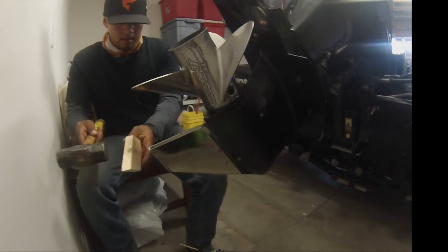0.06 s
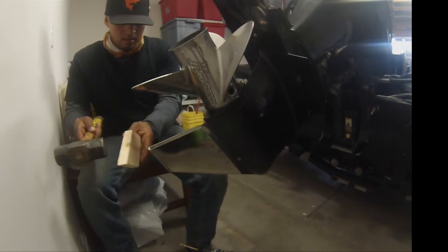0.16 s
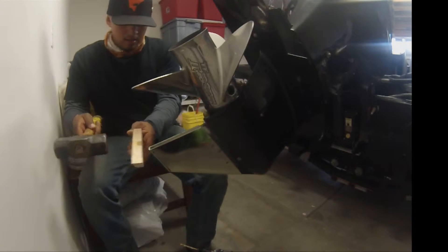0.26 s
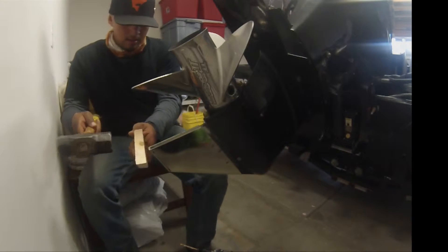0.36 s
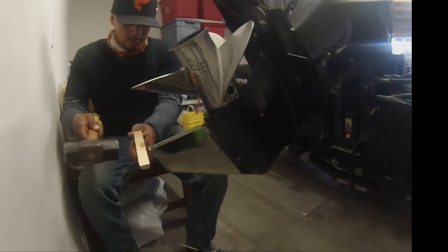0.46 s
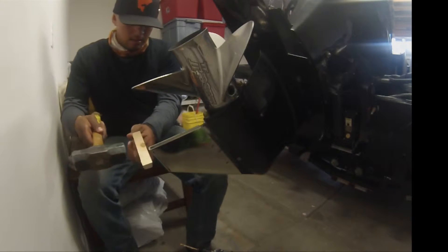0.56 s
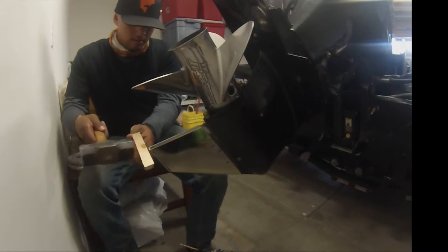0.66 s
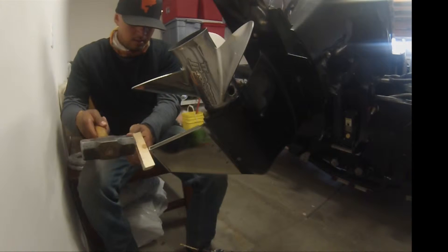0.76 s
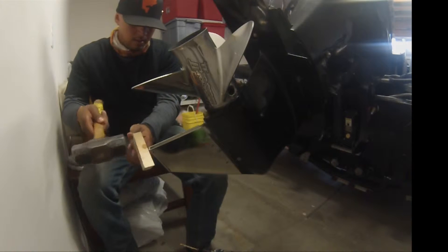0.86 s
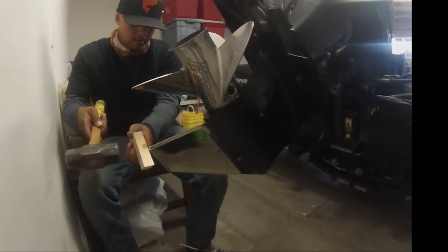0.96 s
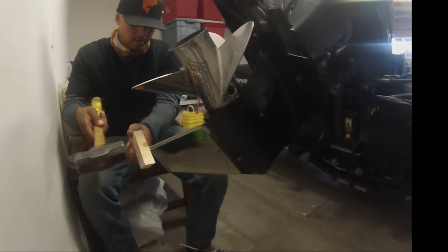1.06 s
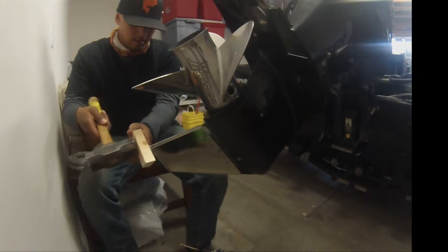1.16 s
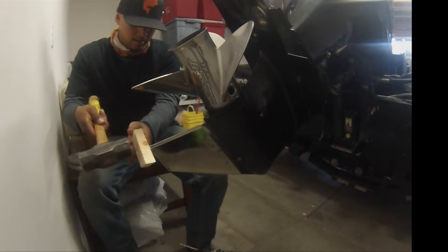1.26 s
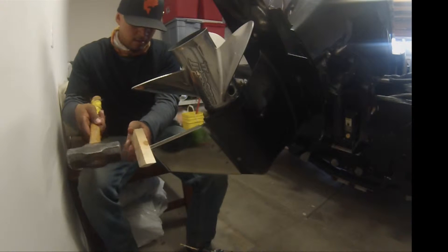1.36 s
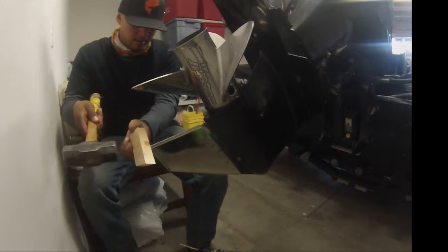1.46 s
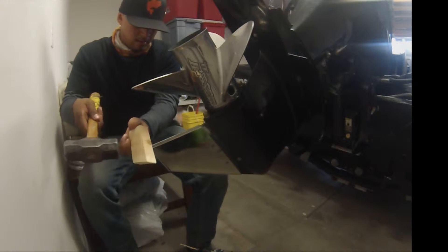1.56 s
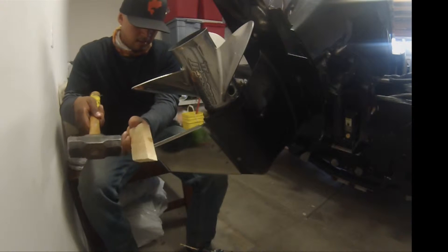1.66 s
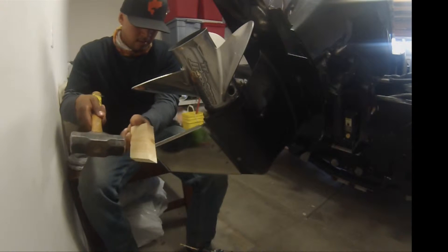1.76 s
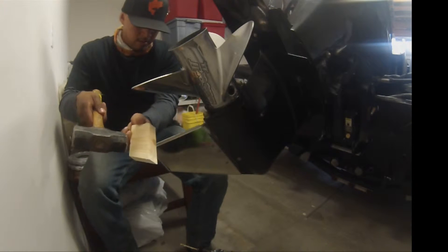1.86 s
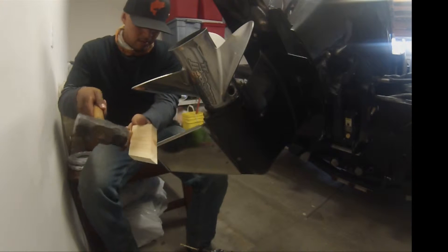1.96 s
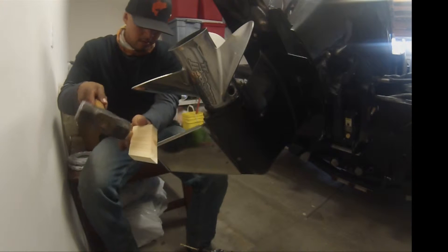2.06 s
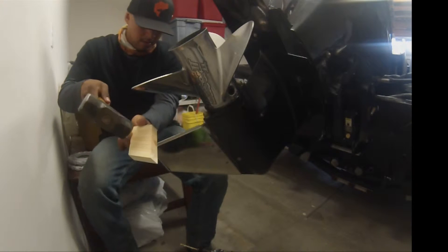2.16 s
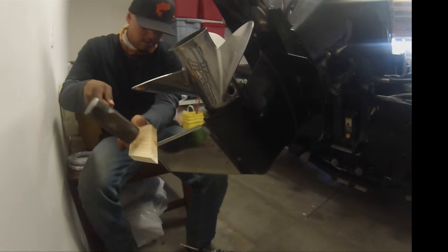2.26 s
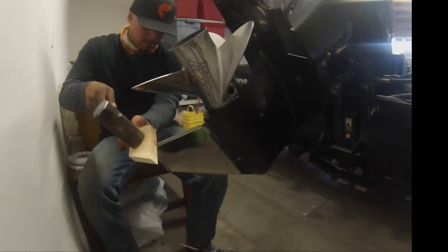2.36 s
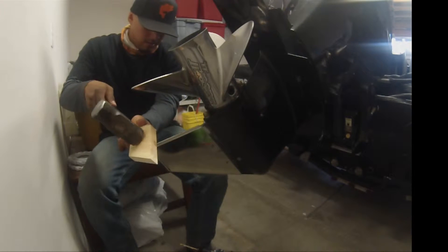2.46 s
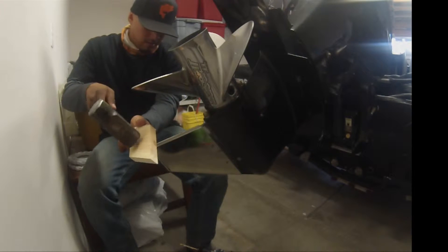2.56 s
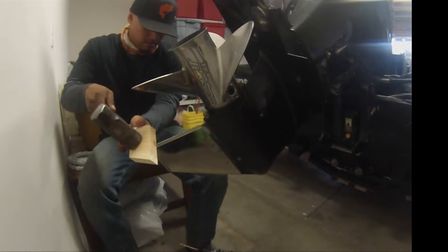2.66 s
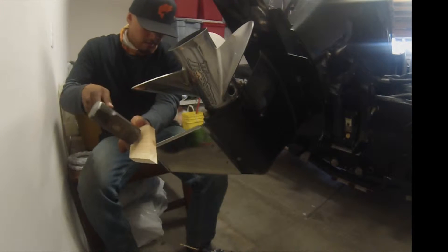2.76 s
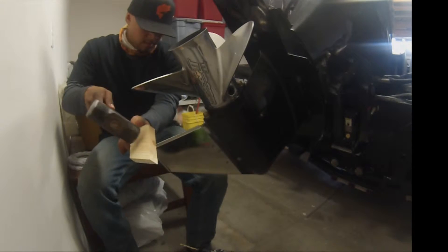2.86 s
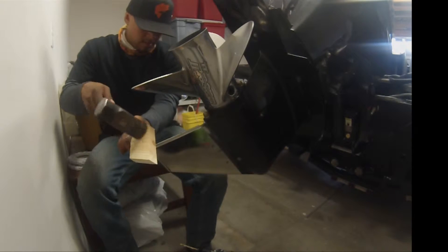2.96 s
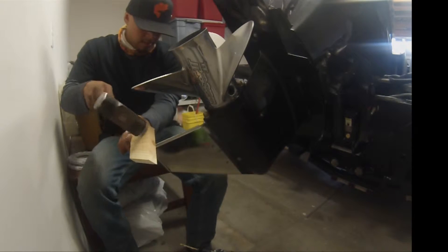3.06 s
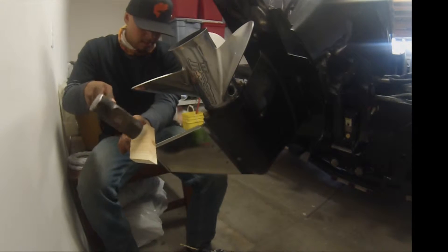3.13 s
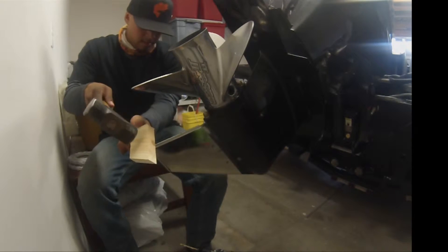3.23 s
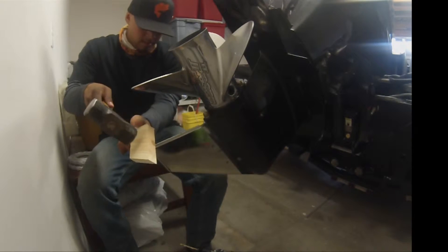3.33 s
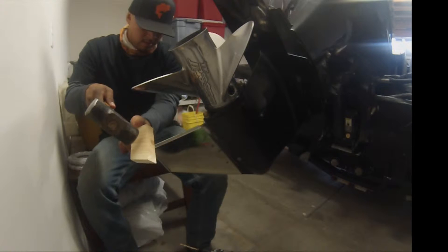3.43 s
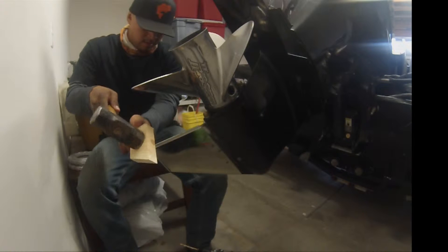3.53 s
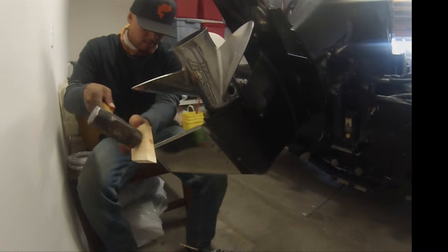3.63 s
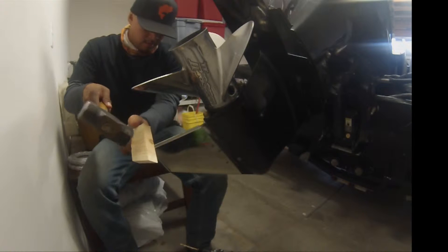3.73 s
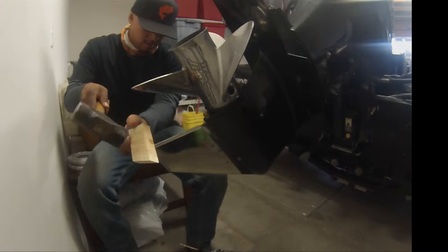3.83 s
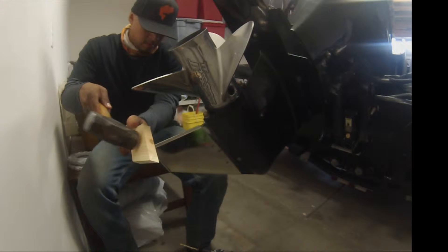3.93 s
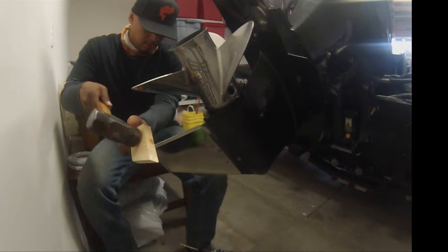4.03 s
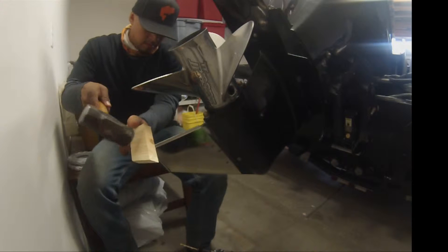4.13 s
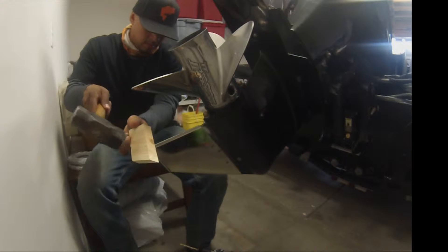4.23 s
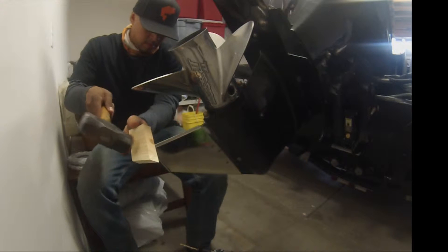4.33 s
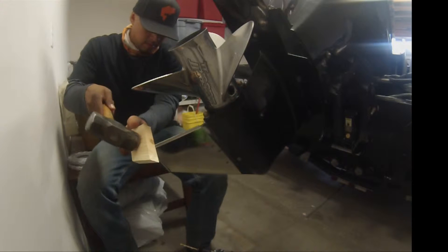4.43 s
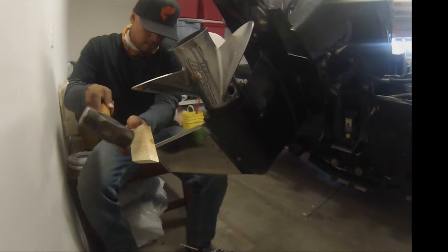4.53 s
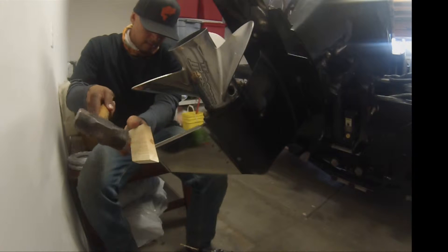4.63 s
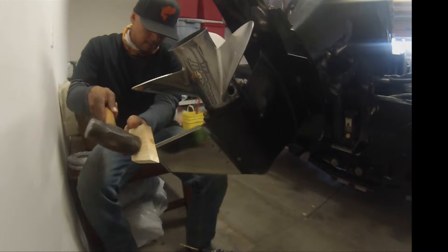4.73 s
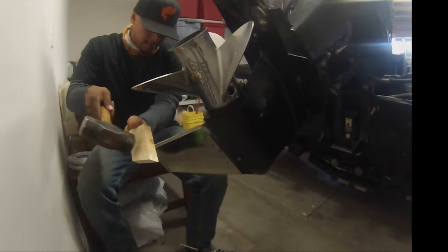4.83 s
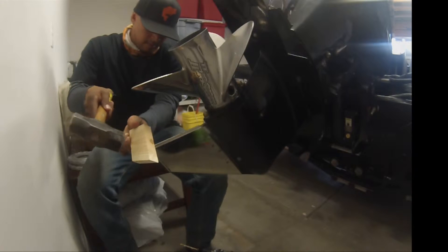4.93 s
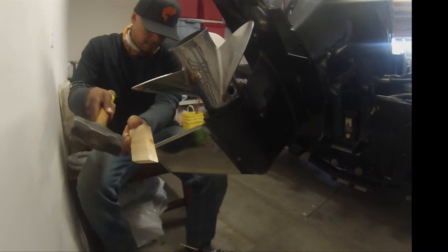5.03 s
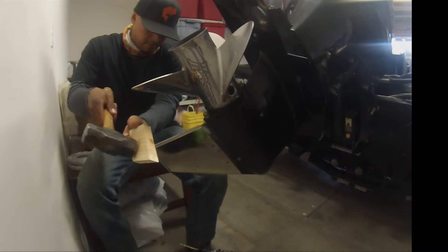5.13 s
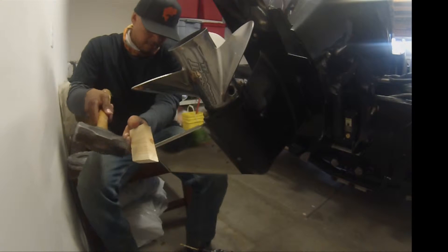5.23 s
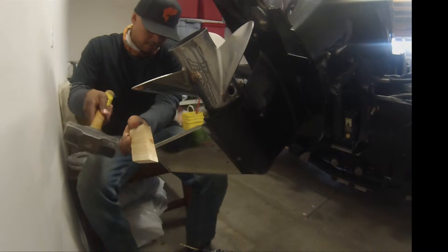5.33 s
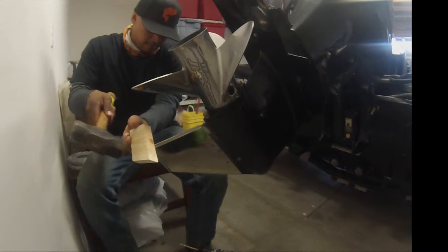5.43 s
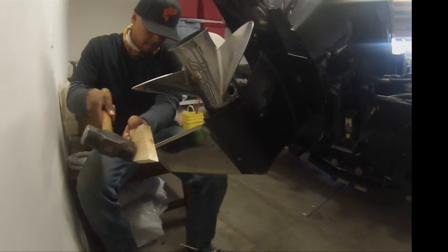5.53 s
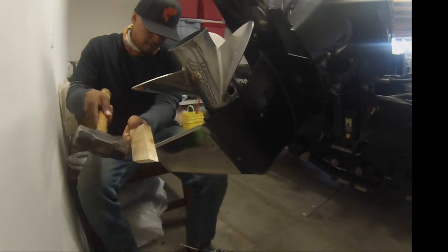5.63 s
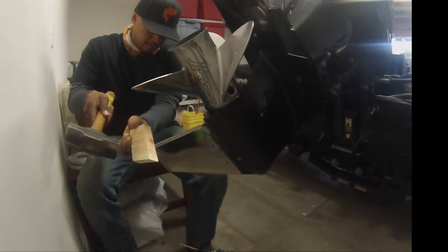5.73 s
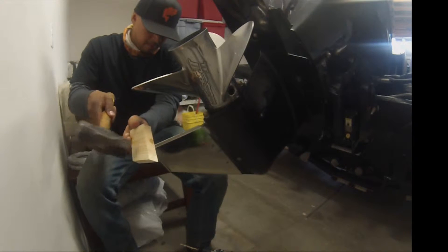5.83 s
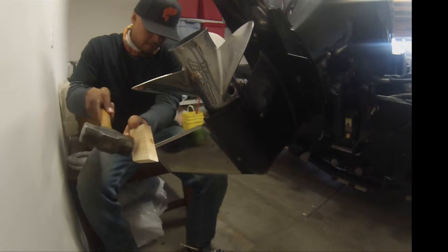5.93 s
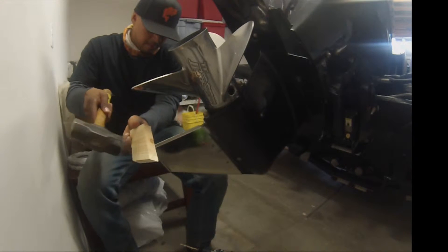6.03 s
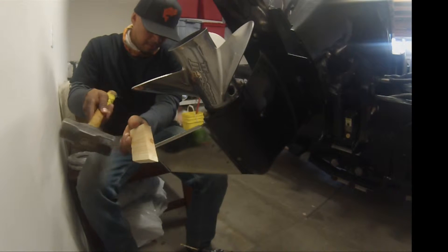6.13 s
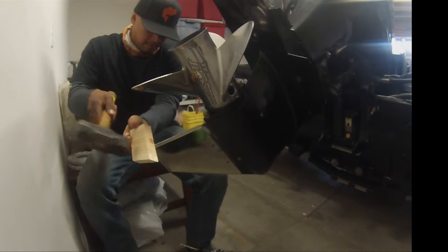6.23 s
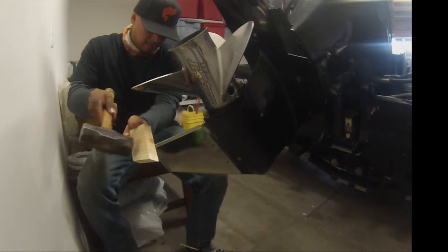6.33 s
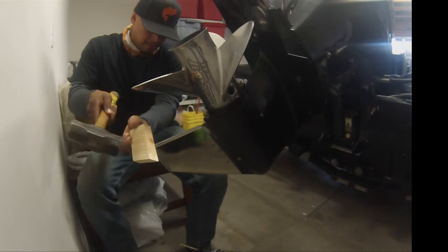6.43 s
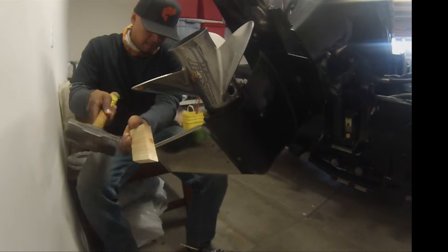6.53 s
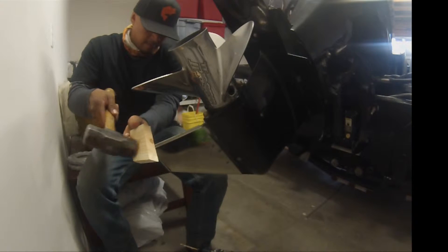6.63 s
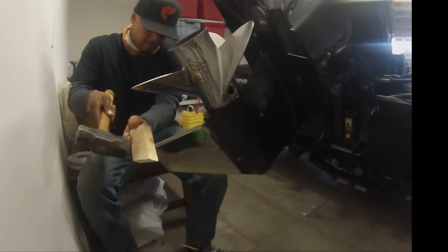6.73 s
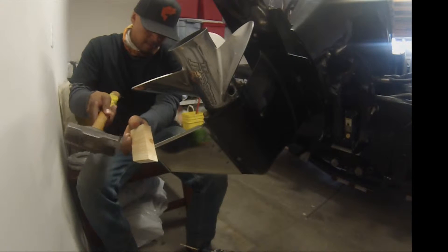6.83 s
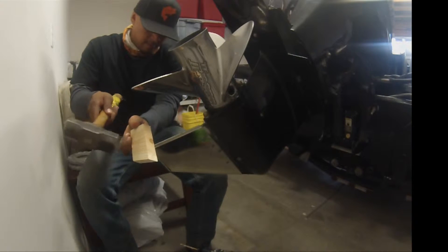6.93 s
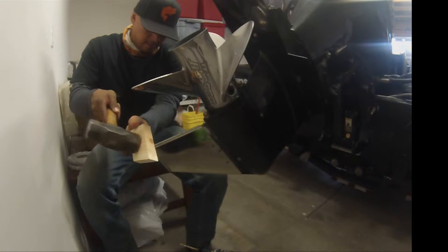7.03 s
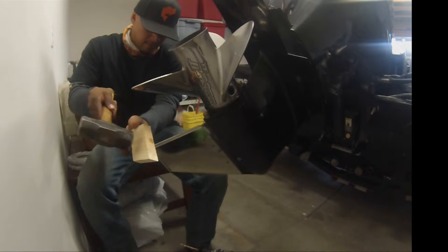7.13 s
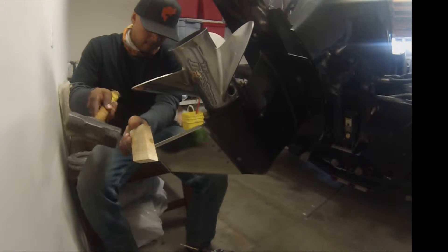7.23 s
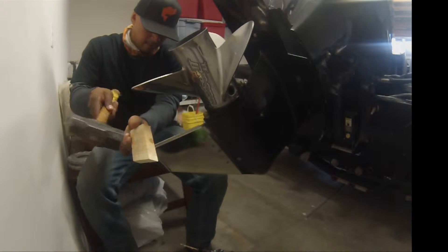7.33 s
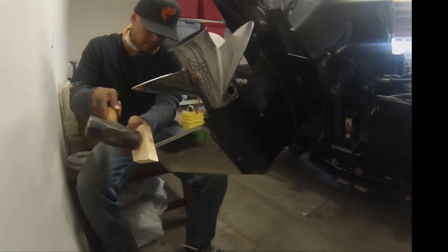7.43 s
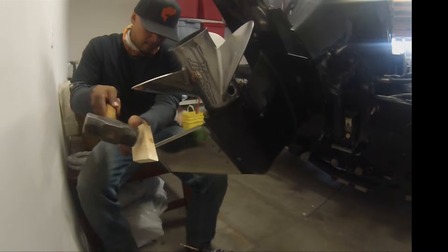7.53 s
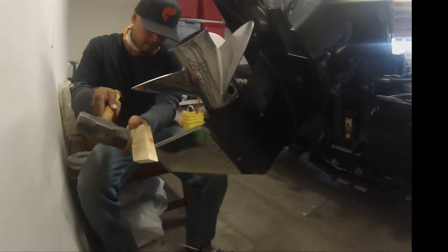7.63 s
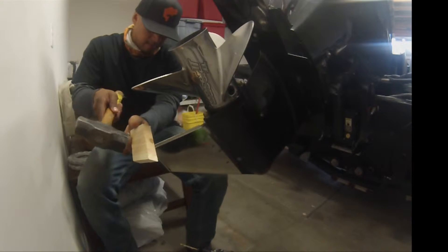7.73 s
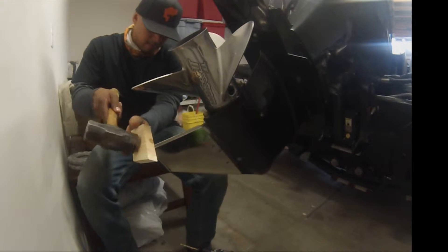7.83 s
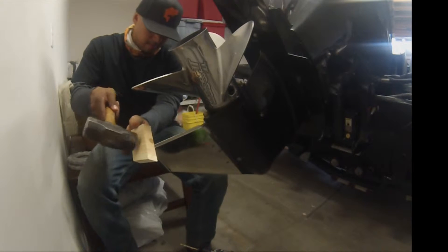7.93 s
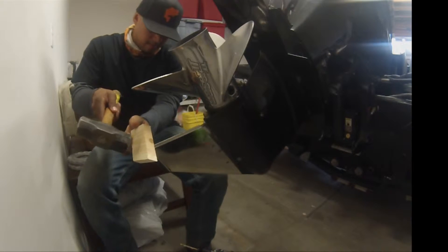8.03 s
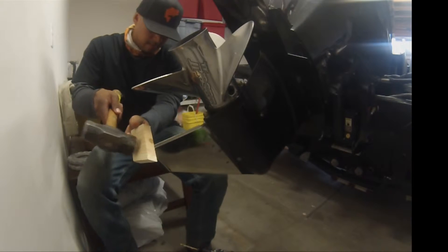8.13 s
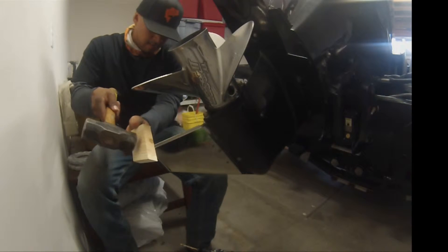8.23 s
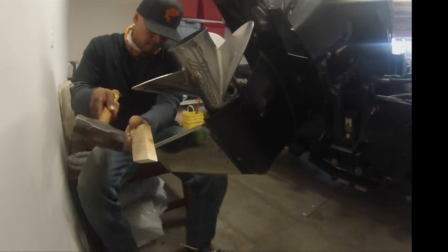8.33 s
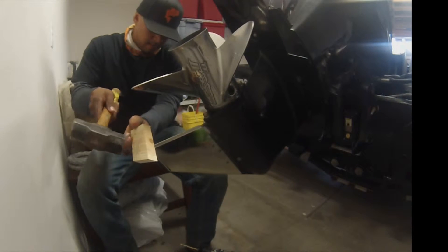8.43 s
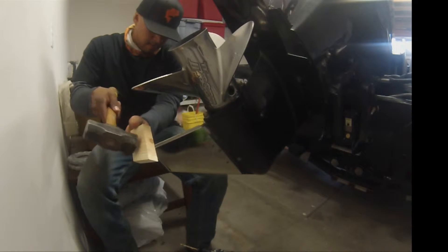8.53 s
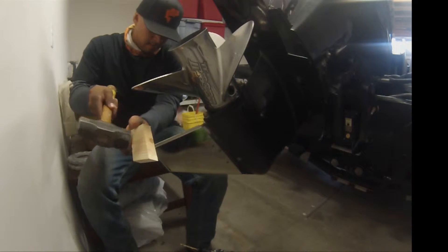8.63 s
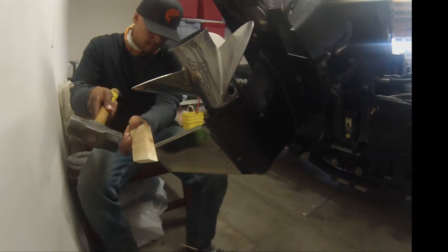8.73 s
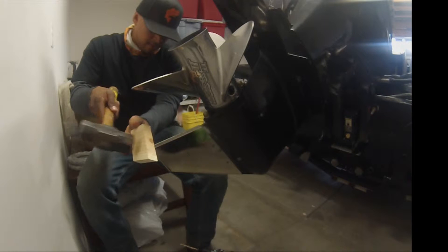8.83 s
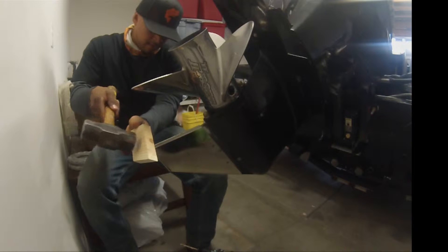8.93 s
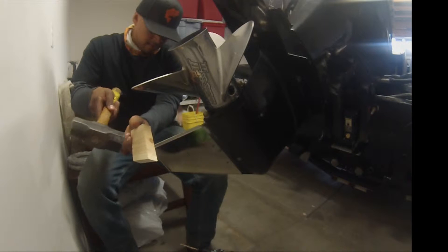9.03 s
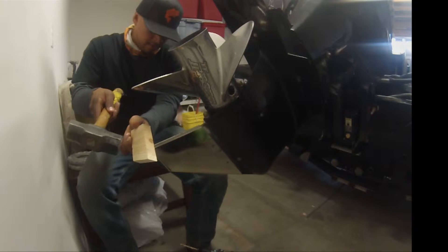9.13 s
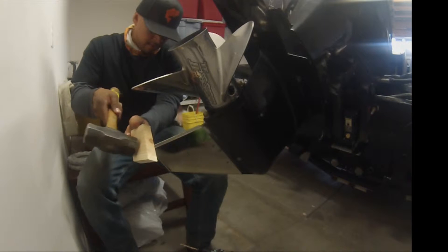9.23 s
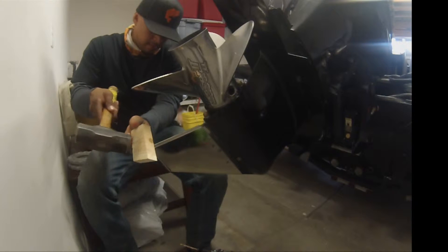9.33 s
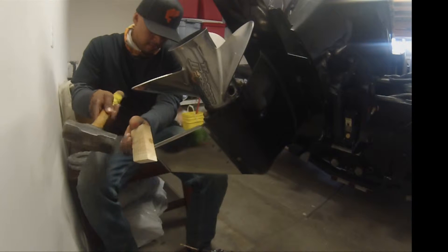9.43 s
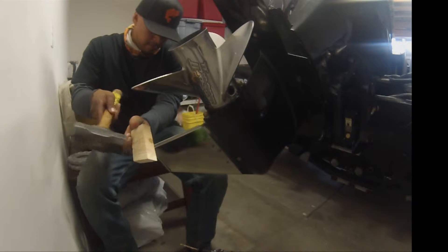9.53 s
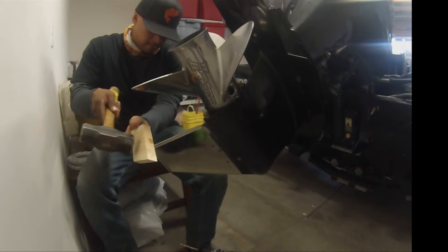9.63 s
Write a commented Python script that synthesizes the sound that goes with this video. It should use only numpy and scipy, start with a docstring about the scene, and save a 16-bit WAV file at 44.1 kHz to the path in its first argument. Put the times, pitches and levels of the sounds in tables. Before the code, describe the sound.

In a garage, close to a small camera microphone, a block is lightly set and rubbed against metal, then a heavy hammer strikes it. First blows are dull and spaced; then hard woody knocks come about every 0.36 seconds, each with a sharp crack, brief ring, low motor boom and short room tail. Faint rumble, hum and hiss lie underneath.

```python
"""Short, hard knocks with a late-swelling boom: a heavy hammer drives a wooden block against a metal guard
on a boat motor, in a garage, close to a two-port camera microphone. Block and guard ring as brief damped
modes with a broad crack; near surfaces repeat each knock and the room draws it out. The motor and its mount
boom on low modes. Light taps and soft rubs also sound, over a dull rumble, a mains hum and microphone hiss."""
import sys
import numpy as np
from scipy import signal
from scipy.fft import rfft, irfft
from scipy.io import wavfile
from scipy.ndimage import uniform_filter1d

SR = 44100
rng = np.random.default_rng(int(sys.argv[2]) if len(sys.argv) > 2 else 0)


def volts(x):
    """Linear amplitude factor 10**(x/20) for a level x in dB, scalar or array-like."""
    e = np.asarray(x, float) / 20
    return 10 ** e


def store_wav(level_fs):
    """Save 16-bit WAV to argv[1]."""
    pcm = np.round(np.clip(np.atleast_2d(level_fs), -1, 1) * 32767)
    wavfile.write(sys.argv[1], SR, pcm.T.astype(np.int16))


N = 426888
TIME = np.arange(N) / SR
PULSE_SIZE = 8192  # samples in the transform behind each knock
# small offsets keep the lowest bin off zero
BINS_HZ = np.fft.rfftfreq(N, 1 / SR) + 1e-3
PULSE_HZ = np.fft.rfftfreq(PULSE_SIZE, 1 / SR) + 1


def by_pitch(at_hz, hz, values):
    """Read a curve along a logarithmic pitch axis."""
    return np.interp(np.log(at_hz), np.log(hz), values)


def decay(t, t60_s):
    """Exponential loss of 60 dB in t60_s, as from steady damping."""
    return np.exp(-np.log(1000) * t / t60_s)


def colour(x, points):
    """Shape a spectrum by (pitch_hz, level_db) points and set rms to 1."""
    hz, db = np.transpose(points)
    shaped = irfft(rfft(x) * volts(by_pitch(BINS_HZ, hz, db)), N)
    return shaped / shaped.std()


def walk(rate_hz):
    """Slow random wander, spread near 1: held random steps, smoothed twice."""
    hold = int(SR / rate_hz)
    steps = np.repeat(rng.standard_normal(N // hold + 1), hold)
    return 0.43 * uniform_filter1d(uniform_filter1d(steps, hold), hold)[:N]


def diffuse():
    """Noise from all sides at two close ports: alike in the bass, unrelated in the treble."""
    port_gap_ms = 0.14  # travel time between the ports
    alike = np.sinc(2 * BINS_HZ * port_gap_ms / 1000)
    mid, side = rfft(rng.standard_normal((2, N)))
    mid = mid * np.sqrt((1 + alike) / 2)
    side = side * np.sqrt((1 - alike) / 2)
    return irfft(np.array([mid + side, mid - side]), N)


# Spectrum of the rumble: pitch_hz, level_db (relative, per Hz)
RUMBLE_COLOUR = [(20, -16), (55, -10.5), (75, -28.5), (100, -3), (150, -20.5), (220, -18.5), (500, -21),
                 (1000, -26.5), (1800, -28), (2700, -40), (5000, -78)]
# Course of the rumble, about which it wanders: time_s, level_db
RUMBLE_LEVEL = [(0, -61), (.6, -59.5), (1.1, -64.5), (1.6, -64), (2.3, -65), (3.5, -66), (9.68, -64.5)]


def rumble():
    """Dull low noise reaching the microphone from all sides, its level wandering."""
    level_db = np.interp(TIME, *np.transpose(RUMBLE_LEVEL)) + 6.3 * walk(7.6)
    return colour(diffuse(), RUMBLE_COLOUR) * volts(level_db)


def hum():
    """Mains hum: one sine, alike in both ports, its level wavering about -74 dB rms."""
    level_db = -74 + 3.0 * walk(2.8)
    return volts(level_db) * np.sqrt(2) * np.sin(2 * np.pi * 59.5 * TIME)


# Spectrum of the microphone hiss: pitch_hz, level_db (relative, per Hz)
HISS_COLOUR = [(200, 8), (1500, -2), (4000, -3.5), (8000, -7), (14500, -6.5), (16500, -28)]


def hiss():
    """Microphone self-noise, unrelated in the two ports."""
    return volts(-65) * colour(rng.standard_normal((2, N)), HISS_COLOUR)


# Late decay of the garage: pitch_hz, t60_s
ROOM_DECAY = [(250, 0.57), (700, 0.51), (2000, 0.56), (5000, 0.58), (10000, 0.41), (16000, 0.3)]
# Near wall, floor and motor casing: delay_ms (at the left port), level_db, left_lead_ms
NEAR_ECHOES = [(1.1, -2, 0.37), (2.01, -11, 0.052), (3.2, -6, 0.068), (3.63, -12, 0.19), (4.35, -2.5, 0.1),
               (5.95, -18.5, 0.26), (6.9, -9.5, 0.049), (8.37, -3, 0.13), (9.4, -10, -0.019),
               (10.6, -17.5, -0.16), (12.5, -10.5, -0.067), (14.1, -7, 0.12), (17.5, -12, 0.053)]


def late_tail():
    """Room reverberation: diffuse noise split by pitch, each band dying at its own pace."""
    late_db, rise_s = -31.5, 0.0013
    noise = rfft(diffuse())
    hz, t60_s = np.transpose(ROOM_DECAY)
    tail = 0
    for k in range(len(hz)):
        share = by_pitch(BINS_HZ, hz, np.arange(len(hz)) == k)
        tail = tail + irfft(noise * share, N) * decay(TIME, t60_s[k])
    return volts(late_db) * tail * (1 - np.exp(-TIME / rise_s))


def early_scatter():
    """Dense reflections from close by: diffuse noise that rises at once and dies quickly."""
    early_db, t60_s, rise_s = -22, 0.097, 0.0013
    return volts(early_db) * diffuse() * decay(TIME, t60_s) * np.clip(TIME / rise_s, 0, 1)


def garage():
    """Response at both ports: direct sound, single echoes, early scatter and late tail."""
    direct_db, direct_lead_ms = 3.5, 0.14
    # a delay is a phase that turns with pitch
    turn = -2j * np.pi * BINS_HZ / 1000
    paths = volts(direct_db) * np.exp(turn * np.array([[0], [direct_lead_ms]]))
    for delay_ms, db, lead_ms in NEAR_ECHOES:
        paths += volts(db) * np.exp(turn * np.array([[delay_ms], [delay_ms + lead_ms]]))
    return (irfft(paths, N) + early_scatter() + late_tail())[:, :SR]


# Block and hand shifting: centre_s, level_db (before the grain), spread_s, pitch_hz
RUBS = [(0.379, -54.5, 0.024, 290), (0.798, -73, 0.027, 400), (0.978, -69, 0.013, 590),
        (1.634, -55.5, 0.012, 560), (1.642, -70.5, 0.0063, 1550), (1.675, -62, 0.012, 354),
        (2.12, -73.5, 0.029, 794)]


def scuffs():
    """Soft grainy rubs, each a broad band of noise that swells and fades."""
    out = np.zeros(N)
    for centre_s, db, spread_s, hz in RUBS:
        band = [(hz / 3, -25), (hz / 1.3, 0), (hz * 1.4, -2), (hz * 3, -16), (hz * 12, -30)]
        rub = colour(rng.standard_normal(N), band)
        out += volts(db) * rub * np.exp(-.5 * ((TIME - centre_s) / spread_s) ** 2)
    grain_db = 3 * walk(120)
    return out * volts(grain_db)


def strike(power):
    """The most compact causal pulse with this power spectrum: everything starts at the contact."""
    half = PULSE_SIZE // 2
    # folding the cepstrum forward gives minimum phase
    cepstrum = irfft(np.log(power + 1e-16) / 2)
    cepstrum[1:half] *= 2
    cepstrum[half + 1:] = 0
    return irfft(np.exp(rfft(cepstrum)))[:half]


def resonances(modes, gains):
    """Power of damped modes side by side, with no cancelling between neighbours."""
    hz, db, t60_s = np.transpose(modes)[:, :, None]
    loss, w = np.log(1000) / t60_s, 2 * np.pi * PULSE_HZ
    response = SR * w / ((loss + 1j * w) ** 2 + (2 * np.pi * hz) ** 2)
    # a small block radiates little below each mode and a finite contact little above it
    skirts = 1 / (1 + (0.62 * hz / PULSE_HZ) ** 4) / (1 + (PULSE_HZ / hz / 1.9) ** 4)
    return np.sum((gains[:, None] * volts(db) * np.abs(response)) ** 2 * skirts, axis=0)


# The block set lightly against the guard: start_s, level_db, pitch_hz, upper_mode_db
LIGHT_TAPS = [(0.3571, -30, 356, -5.5), (0.7558, -39.5, 575, -45)]


def taps():
    """Light contacts of block and guard, each ringing four damped modes."""
    out = np.zeros(N + SR)
    for start_s, db, hz, upper_db in LIGHT_TAPS:
        # pitch_hz, level_db, t60_s
        modes = [(hz, 0, .025), (1.92 * hz, upper_db, .04), (5.2 * hz, -18, .01), (3.4 * hz, -24, .004)]
        pulse = strike(resonances(modes, np.ones(len(modes))))
        out[int(start_s * SR):][:len(pulse)] -= volts(db) * pulse
    return out[:N]


# Motor and mount: pitch_hz, level_db (relative, uneven from blow to blow), t60_s
BOOM_MODES = [(27.5, -16.5, 2.1), (30.1, -18, 0.72), (64.5, -11, 0.76), (75.2, -1.5, 0.5),
              (79.5, -3.5, 0.63), (94.2, -5.5, 0.82), (116.8, -0.3, 0.69), (122.6, -10.5, 0.42),
              (133.3, -2.1, 0.69), (151.3, 0.5, 0.38), (159.5, 3.5, 0.37), (185.6, -3.9, 0.53),
              (205.7, 2, 0.37), (206.7, -2, 0.68), (224, 1, 0.55), (246, 0, 0.55), (273, -15.5, 1.1),
              (327.5, -10.5, 0.34)]


def ring(modes, t):
    """Damped modes after a blow at t = 0; neighbours start in opposition, so the boom swells late."""
    hz, db, t60_s = np.transpose(modes)[:, :, None]
    size = (-1.) ** np.arange(len(modes))[:, None] * volts(db)
    return np.sum(size * decay(t, t60_s) * np.sin(2 * np.pi * hz * t), axis=0)


def motor_boom():
    """Low modes of motor and mount, through the structure; each blow's boom fades out by half a second."""
    boom_db, scatter_db, right_lag = -8.5, 2, 6  # right_lag in samples
    boom = np.zeros(N + SR)
    uneven = scatter_db * rng.standard_normal((len(HAMMER_BLOWS), len(BOOM_MODES)))
    t = TIME[:SR // 2]
    fade = np.clip(t / .01, 0, 1) * np.clip((.5 - t) / .1, 0, 1)
    for (start_s, blow_db, *_), scatter in zip(HAMMER_BLOWS, uneven):
        i = int(start_s * SR)
        modes = np.array(BOOM_MODES) + np.outer(scatter, [0, 1, 0])
        boom[i:i + len(t)] += volts(blow_db + boom_db) * ring(modes, t) * fade
    left = boom[:N]
    right = np.r_[np.zeros(right_lag), left[:-right_lag]]
    return np.array([left, right])


def excited(db, hardness, hz, shape):
    """Gain a blow gives a mode: strength, tilt by hardness, and the mode's swing at the struck spot."""
    pivot_hz, top_hz = 1000, 3500  # hardness tilts about the pivot, no further above the top
    node_db = -29  # what a mode keeps when struck on its node
    octaves = np.log2(np.minimum(hz, top_hz) / pivot_hz)
    return volts(db + hardness * octaves) * np.sqrt(volts(2 * node_db) + shape ** 2)


# Steel on wood: pitch_hz, level_db (relative, uneven from blow to blow)
CRACK_COLOUR = [(2500, -17.5), (4300, -3.5), (6500, -5.5), (7700, 2), (10500, -4), (14000, -17.5),
                (17000, -27)]


def steel_crack(knock_db, hardness, along, ripple):
    """Power of steel biting wood: a broad crack that depends on the spot, uneven in colour each time."""
    crack_db, waves_along = 0.5, 1.28
    like_hz = 2450  # it follows hardness as a mode of this pitch would
    hardness = max(hardness, -2.5)  # dB per octave: even a dull blow keeps a click
    hz, db = np.transpose(CRACK_COLOUR)
    bite = excited(knock_db + crack_db, hardness, like_hz, np.cos(np.pi * waves_along * along))
    return (bite * volts(by_pitch(PULSE_HZ, hz, db) + 3.4 * ripple)) ** 2


# Hammer on block: start_s, boom_db (relative), knock_db (relative), hardness (dB per octave),
# spot_along, spot_across (distance from the middle of the block as a share of its size)
HAMMER_BLOWS = [(1.1912, -39.5, -15.5, -16, 0.203, 0.17), (2.3781, -37, -23, -6, 0.26, 0.15),
                (2.678, -33, -7, 1.5, .25, 0.24), (2.9729, -27, -9.5, 1.1, .24, .09),
                (3.5834, -30, -20.5, -4, 0.07, 0.13), (4.0093, -30, -12, 0.4, 0.25, 0.14),
                (4.429, -23, -8.5, 1.5, 0.2275, .15), (4.7919, -23, -7, -1.7, .01, 0.29),
                (5.16, -26.5, -14, 2, 0.13, .015), (5.547, -28.5, -10.5, -2.5, .02, .26),
                (5.93, -26, -10, -1.4, 0.15, 0.11), (6.3309, -27, -12, 4, .17, .015),
                (6.6881, -25, -7.5, 8.5, 0.53, 0.34), (7.1016, -24, -7, 8, 0.35, 0.35),
                (7.469, -24, -2.5, 3, 0.2105, 0.14), (7.8627, -25, -8, 7, 0.32, 0.36),
                (8.2186, -24.5, -6, 6.5, 0.38, 0.37), (8.5697, -24, -6, 1.5, .16, 0.16),
                (8.9298, -25.5, -12.5, 6.5, 0.17, .015), (9.2857, -23, -4, 4.5, 0.49, 0.34),
                (9.6475, -27, -6.5, 3.5, .01, .33)]
# Hand-damped block and guard: pitch_hz (before the grip moves it), level_db (relative), t60_s,
# waves_along, waves_across (half-waves)
BLOCK_MODES = [(601, 0.67, 0.019, 0.73, 2.47), (812, -0.67, 0.012, .02, .11), (1071, 8, 0.03, 2.56, 1.563),
               (1360, 12.5, 0.0038, 1.97, 1.17), (1906, 15, 0.0055, 2.49, 1.46),
               (2650, 0.5, 0.0048, 0.83, 2.43), (2980, -15.5, 0.0063, 1.06, 2.2),
               (3680, 1.94, 0.0037, 2.25, 1.226), (5480, -6, 0.0046, 2.87, 1.596)]
# The whole block shoved, in step with the boom: pitch_hz, level_db (relative), t60_s
BLOCK_THUD = [(375, 7.5, 0.016)]


def hammer_knocks():
    """Hammer blows heard through the air: block and guard modes, thud and crack in one pulse each."""
    grip_shift = .015  # the changing grip moves each mode's pitch by about this share
    knock = np.zeros(N + SR)
    grit = uniform_filter1d(rng.standard_normal((len(HAMMER_BLOWS), len(PULSE_HZ))), size=60)
    ripples = grit / grit.std()
    grips = 1 + grip_shift * rng.standard_normal((len(HAMMER_BLOWS), len(BLOCK_MODES)))
    mode_hz, mode_db, t60_s, waves_along, waves_across = np.transpose(BLOCK_MODES)
    for blow, ripple, grip in zip(HAMMER_BLOWS, ripples, grips):
        start_s, boom_db, knock_db, hardness, along, across = blow
        shape = np.cos(np.pi * waves_along * along) * np.cos(np.pi * waves_across * across)
        gains = excited(knock_db, hardness, mode_hz, shape)
        body = resonances(np.transpose([mode_hz * grip, mode_db, t60_s]), gains)
        thud = resonances(BLOCK_THUD, volts(np.array([boom_db])))
        crack = steel_crack(knock_db, hardness, along, ripple)
        pulse = strike(body + thud + crack)
        i = int(start_s * SR)
        # the face first moves away from the microphone
        knock[i:i + len(pulse)] -= pulse
    return knock[:N]


def scene():
    """Knocks, taps and scuffs in the garage, with the boom, over the background."""
    background = rumble() + hum() + hiss()
    close = hammer_knocks() + taps() + scuffs()
    air = signal.fftconvolve(close[None], garage(), axes=1)[:, :N]
    return air + motor_boom() + background


def band_limit(x):
    """A steep low-pass at the top of the band."""
    return signal.sosfilt(signal.butter(12, 16830, fs=SR, output="sos"), x)


# Colour of the microphone ports: pitch_hz, left_minus_right_db
PORT_COLOUR = [(30, -0.7), (500, -0.84), (1500, -1), (4000, -1.7), (8000, 0.5), (16000, -0.5)]


def record(dry):
    """Camera microphone: the ports differ a little in colour, and the highest peaks are rounded."""
    hz, db = np.transpose(PORT_COLOUR)
    tilt_db = by_pitch(BINS_HZ, hz, db) / 2
    heard = irfft(rfft(dry) * volts(np.array([tilt_db, -tilt_db])), N)
    rounded = np.tanh(.95 * heard) / .95
    return band_limit(rounded)


dry = scene()
out = record(dry)
store_wav(out)
```